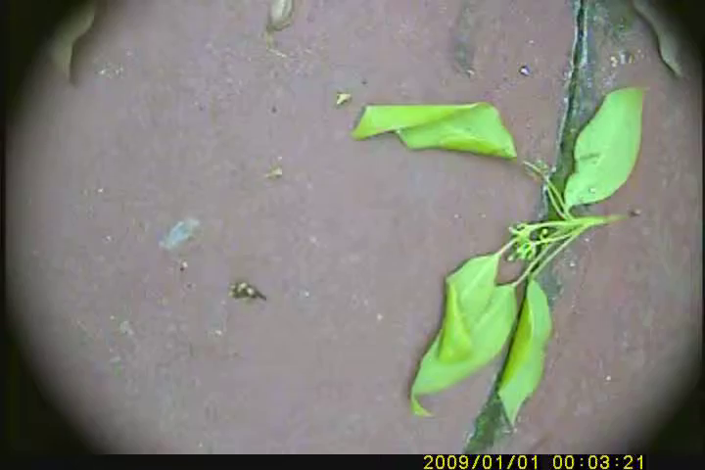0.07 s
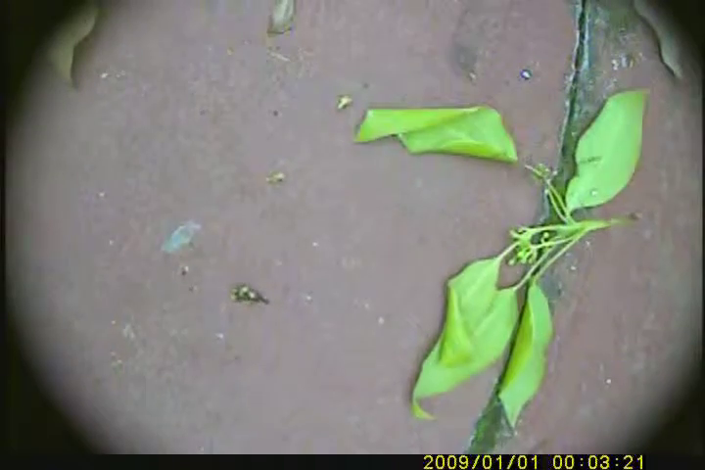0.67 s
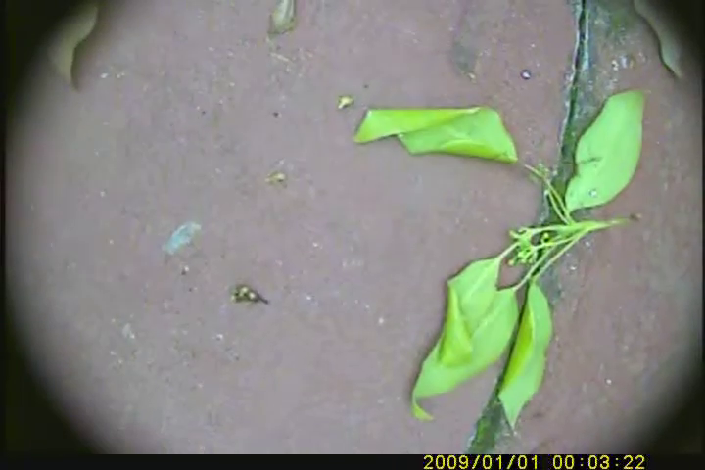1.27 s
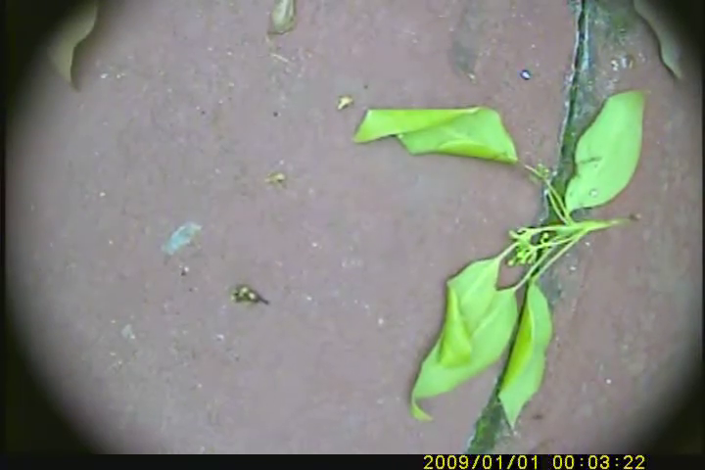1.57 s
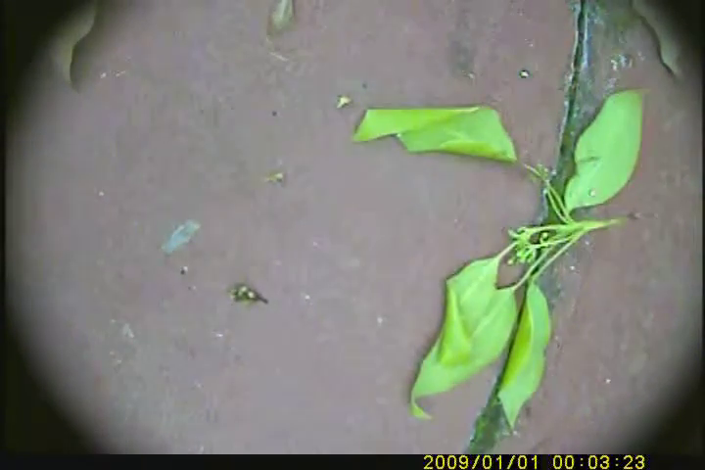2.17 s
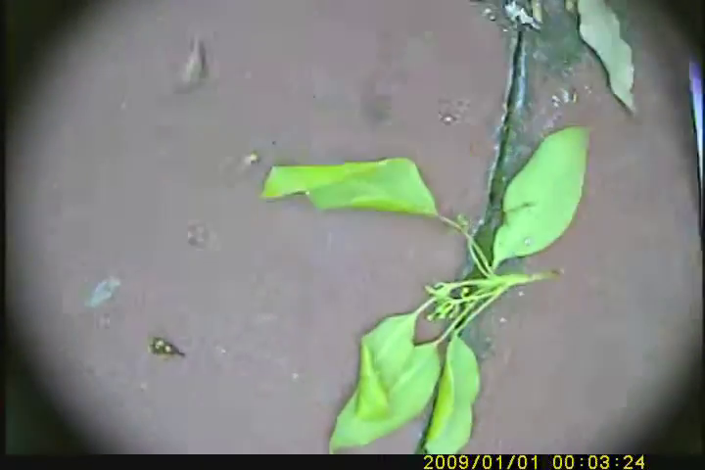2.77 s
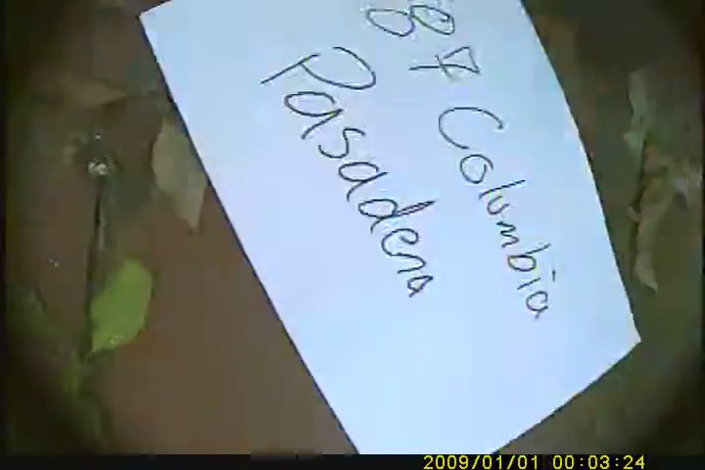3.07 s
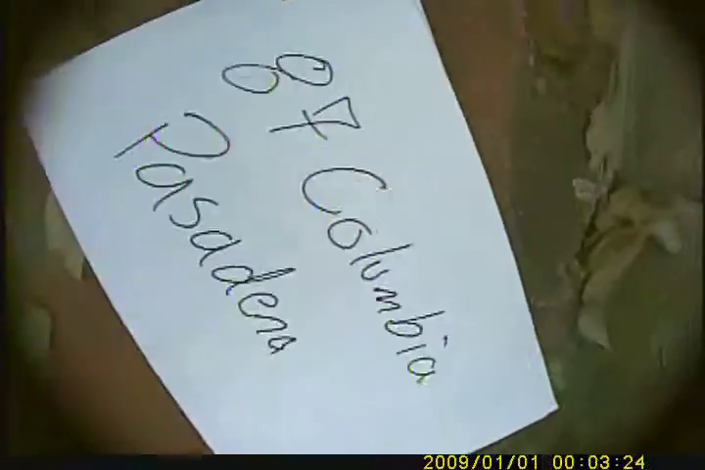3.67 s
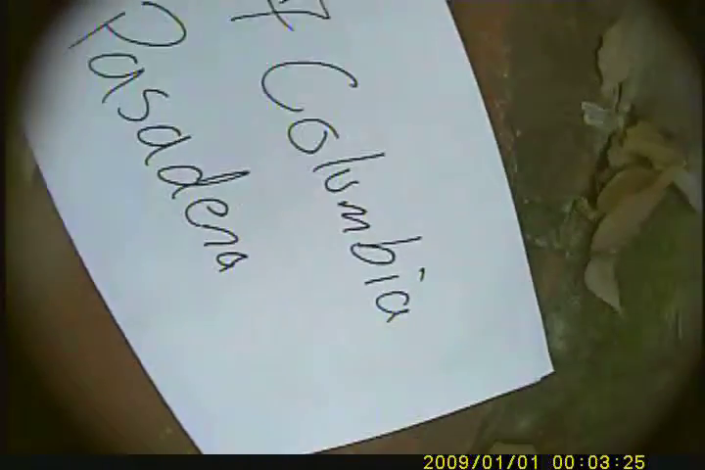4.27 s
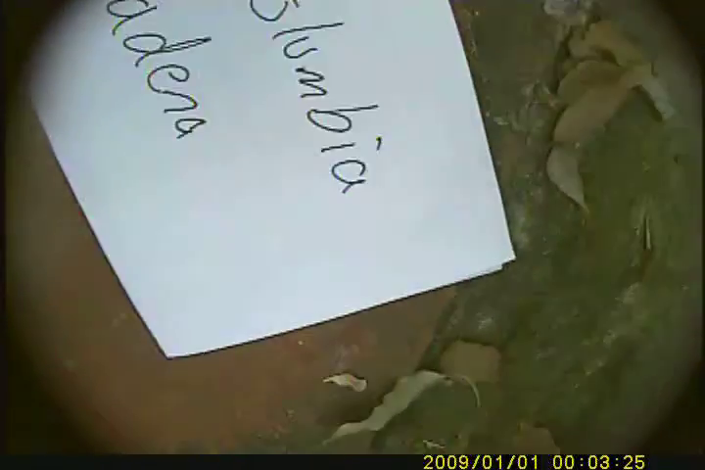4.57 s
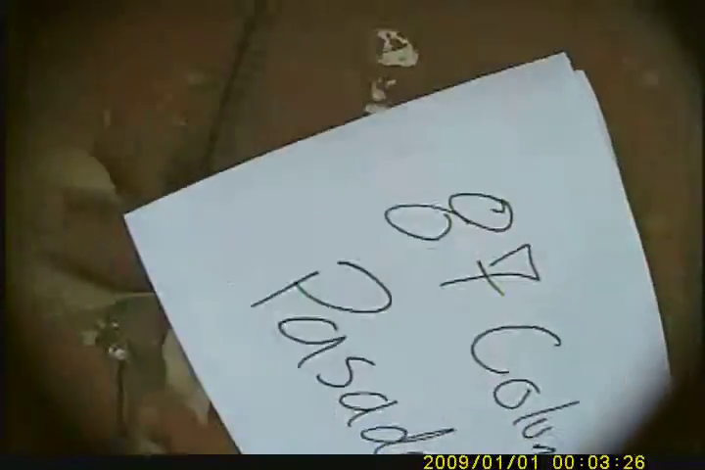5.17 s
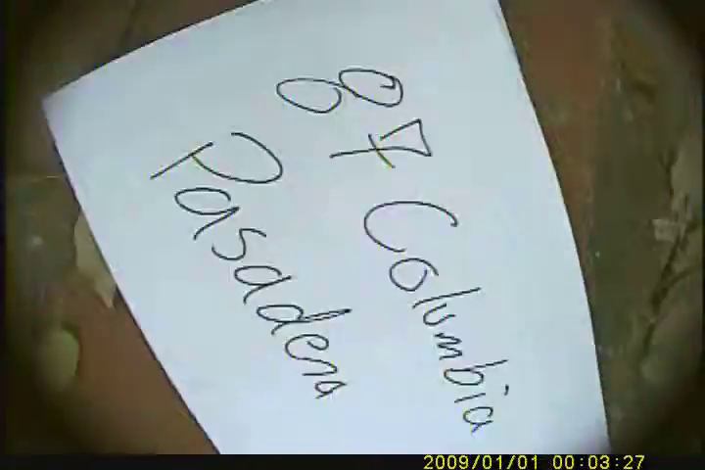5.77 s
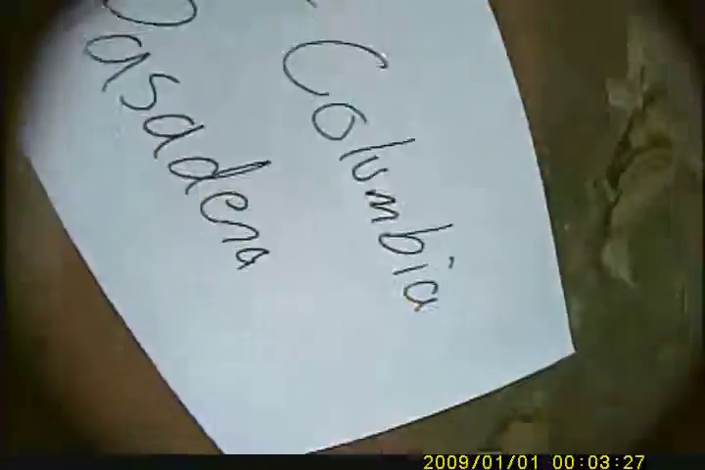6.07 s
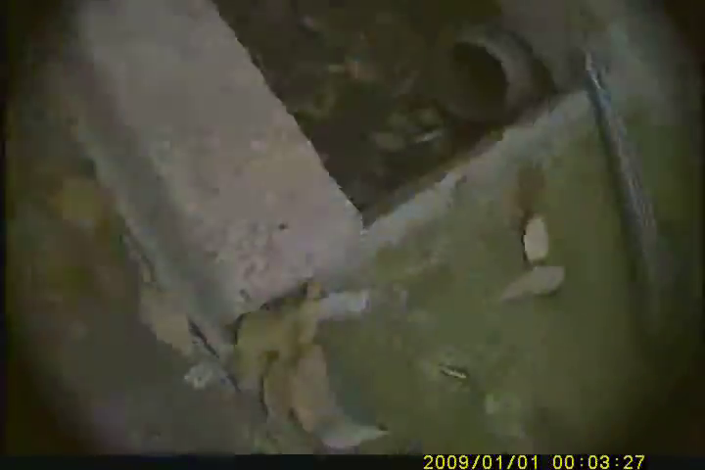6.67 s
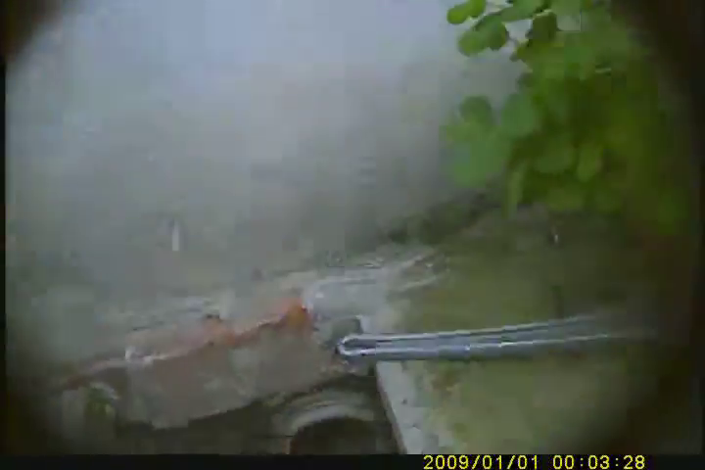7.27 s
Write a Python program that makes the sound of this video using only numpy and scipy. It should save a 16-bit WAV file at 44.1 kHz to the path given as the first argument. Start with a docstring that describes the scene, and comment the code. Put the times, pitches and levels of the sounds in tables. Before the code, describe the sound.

A thin, rough, high-pitched electronic whine wavers over a steady, soft hiss.

```python
"""Inside a tiny mono camera: a thin, rough whine over even amplifier hiss and faint circuit hum.
The whine, probably the power converter, sinks slowly in pitch, jitters and now and then sags or stumbles.
Sampling folds its second harmonic down into a faint line that rises as the whine falls."""
import sys
import numpy as np
from scipy.fft import rfft, irfft, next_fast_len
from scipy.io import wavfile
from scipy.ndimage import map_coordinates

SR = 44100
rng = np.random.default_rng(int(sys.argv[2]) if len(sys.argv) > 2 else 0)


def output_pcm(signal):
    """Save a mono or channel-first signal as 16-bit PCM at the path in sys.argv[1].

    Samples are clipped to [-1, 1] before scaling.
    """
    pcm = np.clip(np.atleast_2d(signal).T, -1, 1) * 32767
    wavfile.write(sys.argv[1], SR, np.round(pcm).astype(np.int16))


N = 323253
SAMPLING_HZ, TOP_HZ = 16000, 9000
STUMBLE_HALF_S = .012

# Oscillator stumbles. Each row: centre in seconds, pitch drop in Hz, break-up depth from 0 to 1.
STUMBLES = [(4.414, 399.8, .75), (4.665, 190, 0.69), (5.667, 320, 0.64)]

def whine(t, level_db, folded_db, line_width_hz, flutter_db, flutter_knots_per_s):
    """Free-running oscillator with uneven cycles; in a stumble it breaks into ragged flutter."""
    pitch_hz = whine_pitch(t)
    # timing errors add up to a random phase walk, widening the line
    jitter_rad = np.sqrt(2 * np.pi * line_width_hz / SR) * rng.standard_normal(N)
    phase = np.cumsum(2 * np.pi * pitch_hz / SR + jitter_rad)
    # second harmonic, mirrored about half the sampling rate
    folded_phase = 2 * np.pi * SAMPLING_HZ * t - 2 * phase
    steady = tone(phase, level_db) + tone(folded_phase, folded_db)
    flutter = wobble(flutter_knots_per_s) * np.sin(phase) + wobble(flutter_knots_per_s) * np.cos(phase)
    breakup = sum(depth * bell(t, centre_s, STUMBLE_HALF_S) for centre_s, _, depth in STUMBLES)
    breakup = np.clip(breakup, 0, 1)
    return (1 - breakup) * steady + np.sqrt(breakup) * amp(level_db + flutter_db) * flutter


# Pitch sags without break-up. Each row: centre in seconds, half length in seconds, pitch drop in Hz.
SAGS = [(2.29, .012, 105.1), (3.642, .028, 90), (4.967, .016, 160), (5.209, .014, 90), (6.604, .032, 120),
        (7.277, .016, 110)]

def whine_pitch(t, base_hz=6428, sharp_hz=153, settle_s=.95, sink_hz_per_s=44.5):
    """Oscillator pitch in Hz: starts sharp, settles and sinks, with sags, stumbles and random dips."""
    dip_hz, dips_per_s, dip_half_s = 50, 1.4, .012
    drift_hz = base_hz + sharp_hz * np.exp(-t / settle_s) - sink_hz_per_s * t
    draws = rng.uniform(size=(round(dips_per_s * N / SR), 2))
    dips = [(when * N / SR, dip_half_s, dip_hz * (.5 + depth)) for when, depth in draws]
    stumbles = [(centre_s, STUMBLE_HALF_S, drop_hz) for centre_s, drop_hz, _ in STUMBLES]
    drops = SAGS + stumbles + dips
    return drift_hz - sum(drop_hz * bell(t, centre_s, half_s) for centre_s, half_s, drop_hz in drops)


# Hiss spectrum. Each row: frequency in Hz, relative density in dB.
HISS_SPECTRUM = [(15, 6), (30, 3.5), (55, 1.5), (100, -1), (400, -1.06), (1500, -1), (3000, -1),
                 (5000, -1.5), (6500, -1), (8000, 0)]

def hiss(level_db):
    """White amplifier noise with a little flicker noise in the bass."""
    return amp(level_db) * unit(shaped(rng.standard_normal(N), HISS_SPECTRUM))


# Circuit tones. Each row: frequency in Hz, rms level in dB.
HUM_TONES = [(60, -88), (264.5, -84), (529, -86), (1342, -87)]

def hum(t):
    """Steady circuit tones, barely above the hiss."""
    return sum(tone(2 * np.pi * hz * t + rng.uniform(0, 2 * np.pi), db) for hz, db in HUM_TONES)


def amp(db):
    """Decibels to gain."""
    return 10 ** (np.asarray(db) / 20)


def unit(x):
    """Scale to rms 1."""
    return x / np.sqrt(np.mean(x ** 2))


def tone(phase, rms_db):
    """Sine at the given level."""
    return np.sqrt(2) * amp(rms_db) * np.sin(phase)


def wobble(knots_per_s):
    """Smooth random curve."""
    knots = rng.standard_normal(int(N * knots_per_s / SR) + 4)
    return map_coordinates(knots, [np.arange(N) * knots_per_s / SR])


def bell(t, centre_s, half_s):
    """Gaussian pulse of height 1."""
    return np.exp(-((t - centre_s) / half_s) ** 2)


def filtered(x, response):
    """Zero-phase filter with gain response(hz)."""
    size = next_fast_len(N + SR // 2)
    hz = np.fft.rfftfreq(size, 1 / SR)
    return irfft(rfft(x, size) * response(hz), size)[..., :N]


def shaped(x, curve):
    """Filter by (Hz, dB) points on a log frequency axis, cut at TOP_HZ."""
    knots_hz, knots_db = np.transpose(curve)

    def response(hz):
        gain_db = np.interp(np.log(hz + 1), np.log(knots_hz + 1), knots_db)
        return amp(gain_db) * (hz < TOP_HZ)
    return filtered(x, response)


def scene():
    """Hiss, hum and whine from one circuit, the same in both channels."""
    t = np.arange(N) / SR
    mono = hiss(level_db=-55.5) + hum(t)
    mono += whine(t, level_db=-45.5, folded_db=-63.5, line_width_hz=65.2,
                  flutter_db=-3, flutter_knots_per_s=450)
    return np.array([mono, mono])


# Camera treble roll-off. Each row: frequency in Hz, gain in dB.
TREBLE_ROLL_OFF = [(6500, 0), (7200, -0.6), (7700, -3), (8000, -6), (8300, -11.5), (8600, -20.5),
                   (8900, -31), (9000, -38)]

def record(dry, switch_on_s=0.036, dc_offset=-0.018):
    """The input switches on, resting slightly off zero, and is sampled at a low rate."""
    t = np.arange(N) / SR
    live = (dry + dc_offset) * (t >= switch_on_s)
    band_limited = filtered(live, lambda hz: hz < SAMPLING_HZ / 2)
    # sampling mirrors the treble upwards; the soft roll-off passes a little of that image
    imaged = band_limited * (1 + 2 * np.cos(2 * np.pi * SAMPLING_HZ * t))
    return shaped(imaged, TREBLE_ROLL_OFF)


dry = scene()
out = record(dry)
output_pcm(out)
```